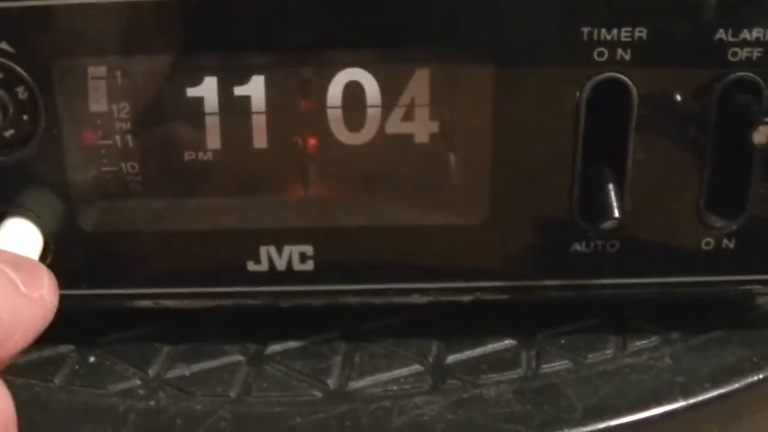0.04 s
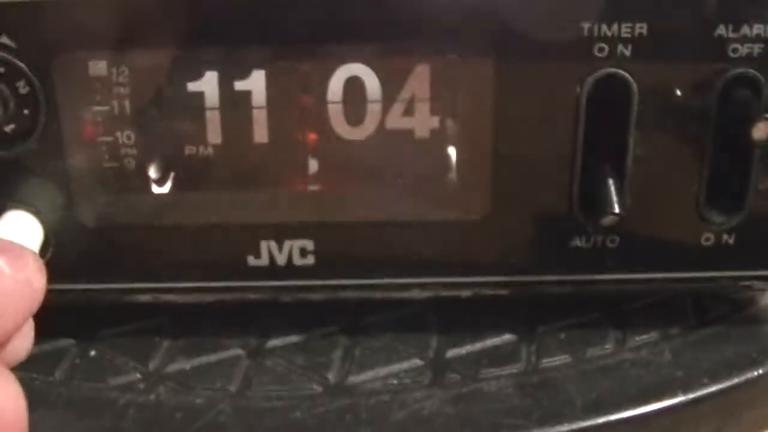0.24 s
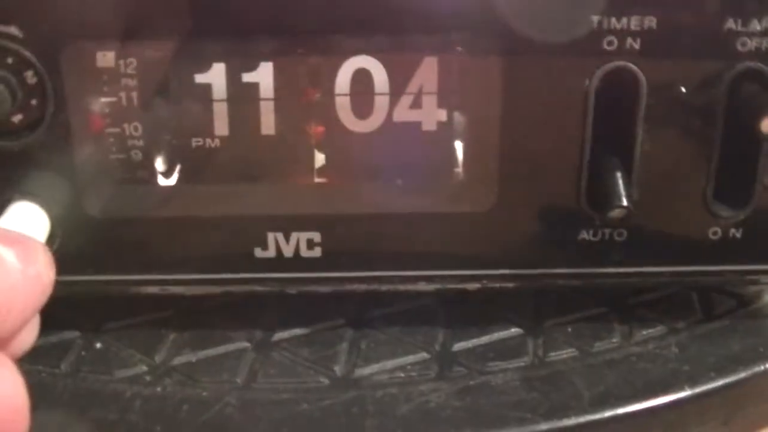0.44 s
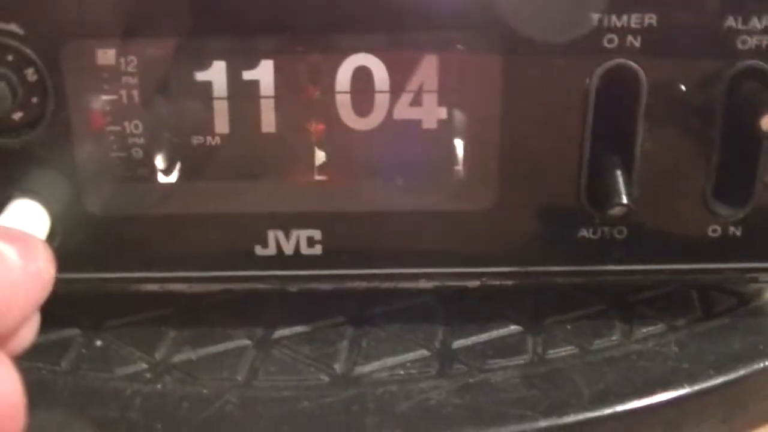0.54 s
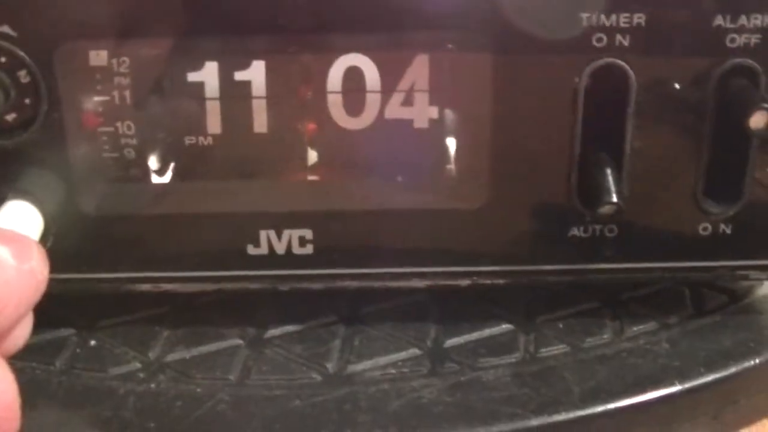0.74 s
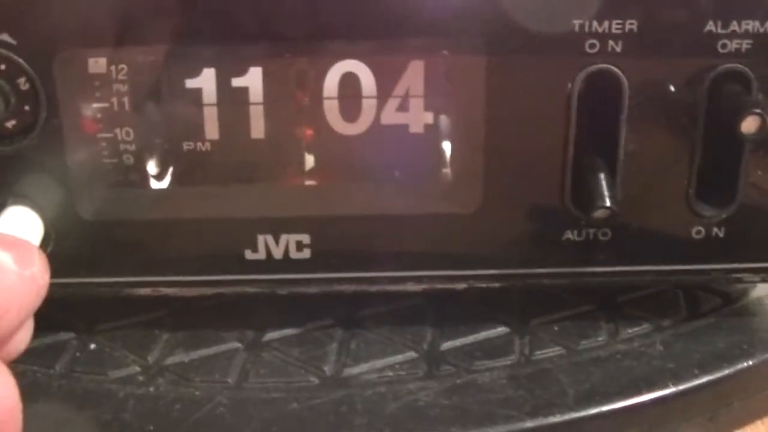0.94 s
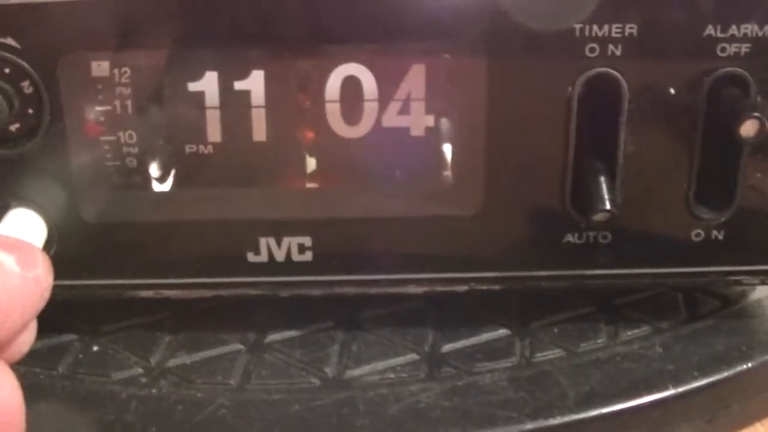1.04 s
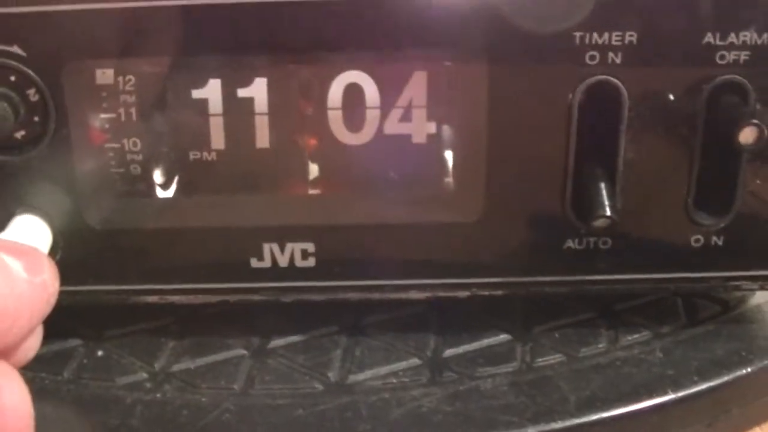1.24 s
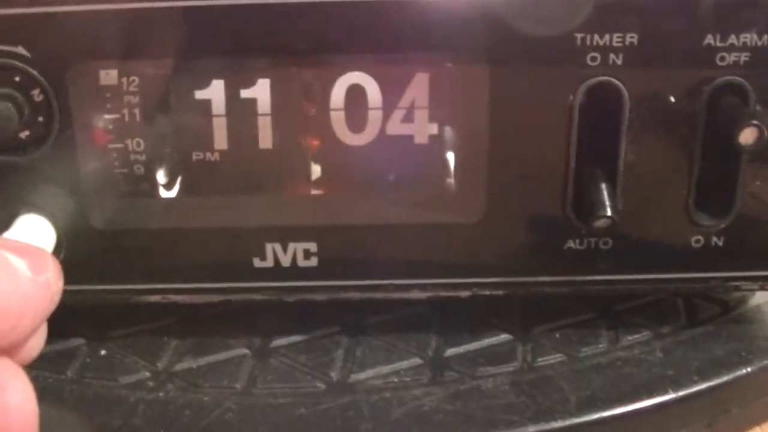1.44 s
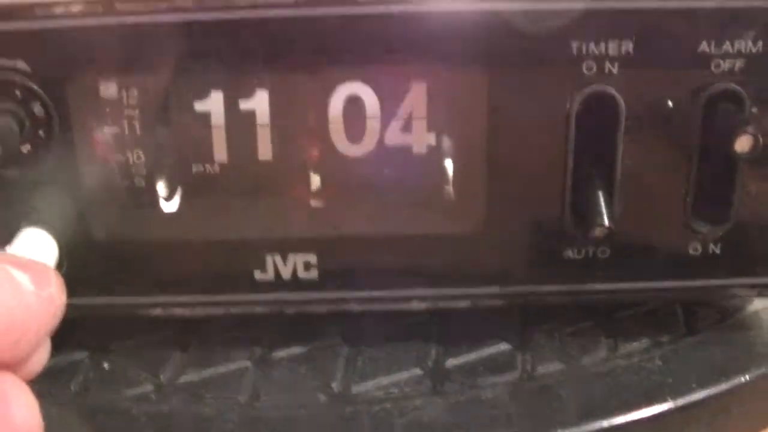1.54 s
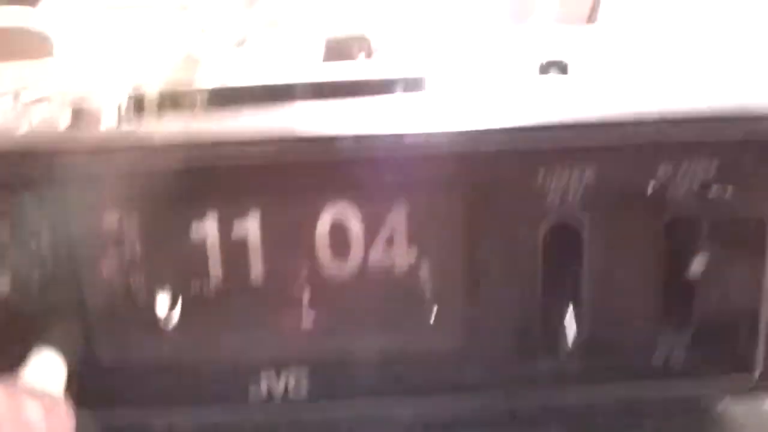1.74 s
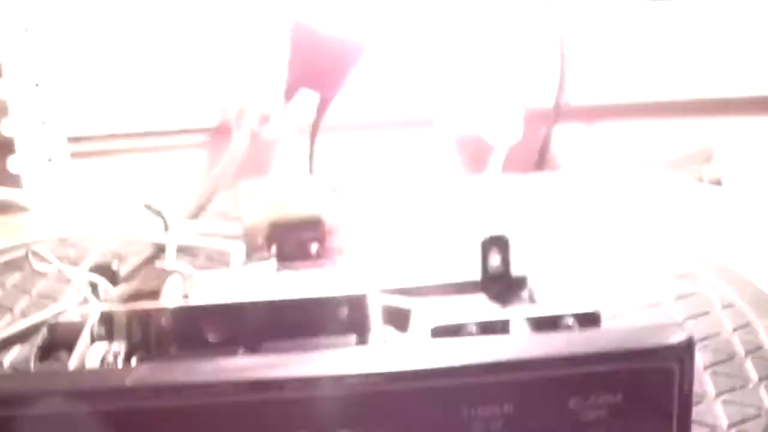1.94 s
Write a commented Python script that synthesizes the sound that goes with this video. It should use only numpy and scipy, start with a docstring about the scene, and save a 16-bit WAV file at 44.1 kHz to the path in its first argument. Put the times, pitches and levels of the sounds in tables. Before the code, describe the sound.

One sharp button click on a flip clock radio, over its faint ticking motor.

```python
"""A button on a flip clock radio

A finger presses the button, close by in a small room. The latch scrapes, snaps home against the
plastic case and rattles; each impact excites damped modes, and the spring rings on. The motor hums,
its gears tick in a quick loop, and the finger makes small creaks on the button."""
import sys
import numpy as np
from scipy import signal
from scipy.fft import rfft, irfft
from scipy.io import wavfile

SR = 44100
rng = np.random.default_rng(int(sys.argv[2]) if len(sys.argv) > 2 else 0)


def transcribe(signal):
    """Save signal, clipped to [-1, 1], as a 16-bit WAV file at the path in sys.argv[1]."""
    frames = np.atleast_2d(signal).T
    limited = np.clip(frames, -1, 1)
    pcm = np.round(limited * 32767).astype(np.int16)
    wavfile.write(sys.argv[1], SR, pcm)


N = 88200
T = np.arange(N) / SR
MOTOR_PAN_DB = 1.1
# the latch snaps home and bounces: start_s, level_db
SNAPS = [(0.2140, -13.5), (0.2154, -25), (0.2171, -27.5)]
SNAP_S = SNAPS[0][0]
# left-right coherence of contacts and echoes: frequency_hz, correlation
COHERENCE = [(100, 0.21), (400, 0.99), (1300, 0.97), (4000, 0.95), (8000, 0.34), (15000, 0.13)]


def case():
    """Impact excitation: the snap and its bounces ring the damped modes of the plastic case."""
    # case modes: pitch_hz, level_db, t60_s, pan_db
    modes = [(513, -6, 0.015, 2), (745, -5.5, 0.012, 1), (960, -5.5, 0.023, .8), (1290, -1, 0.0067, 0.5),
             (2004, -1, 0.018, 2), (3093, 1, 0.014, 1.2), (4510, -8.5, 0.024, -.8), (6670, -6.5, 0.017, -1),
             (8320, -4.5, 0.006, -3), (9050, -6.5, 0.0068, 1), (14500, -10, 0.0044, -3)]
    return sum((-1) ** k * pan(pan_db) * ring(clicks(SNAPS), [(hz, db, t60)])
               for k, (hz, db, t60, pan_db) in enumerate(modes))


def latch():
    """Friction and impact: each light contact of the metal latch scrapes and rings its modes."""
    # contacts: start_s, level_db, t60_s
    contacts = [(0.2075, -17.5, 0.031), (0.2377, -22.5, 0.0047), (0.2481, -22, 0.0096)]
    # scrape spectrum: frequency_hz, density_db
    spectrum = [(180, -63), (300, -21), (1970, -2.5), (2880, -33), (5160, -5.5), (6520, -12), (9240, -3.5),
                (11300, 0.5), (12300, -1), (14700, -17.5), (16000, 0)]
    # latch modes: pitch_hz, level_db, t60_s
    modes = [(7920, -6.5, 0.022), (8730, -2.5, 0.019), (9440, -5, 0.048), (11880, -6, 0.011),
             (14400, -9, .022)]
    scrape = noise(spectrum) * sum(from_db(db) * decay(s, t60) for s, db, t60 in contacts)
    return scrape + ring(clicks([(s, db - 3) for s, db, _ in contacts]), modes)


def spring():
    """Free vibration: the lightly damped spring and frame ring on after the snap."""
    # spring and frame modes: pitch_hz
    pitches = [345, 680, 1260, 1922, 2068, 2211, 2707, 2944, 3346, 3454, 3989]
    # their strength and damping: level_db, t60_s
    decays = [(-46.5, 0.25), (-47, 0.19), (-37, 0.08), (-33, 0.19), (-40, 0.51), (-62, 0.12), (-33.5, 0.16),
              (-53, 0.11), (-37, 0.13), (-39, 0.24), (-53, 0.11)]
    modes = [(hz, db, t60) for hz, (db, t60) in zip(pitches, decays)]
    return pan(-0.6) * ring(clicks([(SNAP_S, 0)]), modes)


def room():
    """Reverberation: the snap's crack leaves a diffuse tail, whose bass builds up later."""
    # crack and tail spectrum: frequency_hz, density_db
    spectrum = [(35, -74), (60, -55), (196, 2), (272, -5), (343, -0.5), (433, -16), (509, -3), (705, -7.5),
                (1050, -7), (2010, -2), (2360, -2), (3420, -3.5), (7200, -12), (8280, -7), (9300, -8),
                (14500, -16), (15500, -30)]
    # room bass spectrum: frequency_hz, density_db
    bass = [(30, -24), (120, -26.5), (200, 2), (270, -21.5), (345, 1.5), (520, -11), (900, -22.5),
            (4000, -66)]
    crack = from_db(-15) * noise(spectrum) * decay(SNAP_S, t60_s=0.01)
    tail = from_db(-28.5) * noise(spectrum) * decay(SNAP_S, t60_s=0.17, hold_s=0.027)
    tail *= np.clip((T - SNAP_S) / 0.0013, 0, 1)
    boom = from_db(-44) * noise(bass) * decay(SNAP_S, t60_s=0.12, hold_s=0.015)
    boom *= np.clip((T - SNAP_S) / 0.015, 0, 1)
    bass_cut = signal.butter(1, 420, "high", fs=SR, output="sos")
    return boom + signal.sosfilt(bass_cut, crack + tail)


def gears():
    """Backlash: slipping teeth and clacks of closing play ring the gear train in turn."""
    # once a turn a few teeth slip past: time_s, level_db
    runs = [(0.0955, -51.5), (0.396, -50.5), (0.5465, -53.5), (0.6955, -50), (0.8457, -49), (0.9948, -50.5),
            (1.1455, -51), (1.2946, -53.5), (1.4459, -52.5), (1.5944, -51), (1.7452, -48.5),
            (1.8943, -54.5)]
    # teeth of a run, timed from the strongest: offset_s, gain_db
    teeth = [(-.0068, 4), (0, 7.5), (.0085, 1), (0.0164, 0.5)]
    # the play closes and rebounds: start_s, level_db, rebound_delay_s, rebound_db
    closures = [(0.1478, -45, .003, -48), (0.4490, -58, .009, -78), (0.5992, -49, .0175, -45.5),
                (0.7500, -45, .003, -55), (0.8990, -46.5, .008, -50.5), (1.048, -40.5, .010, -49),
                (1.1985, -47, .009, -48), (1.3502, -43.5, .009, -50), (1.499, -46, .004, -61),
                (1.6490, -45.5, .010, -44.5), (1.8006, -51, .013, -47.5), (1.9490, -47.5, .010, -52)]
    # gear train modes: pitch_hz, run_db, clack_db, t60_s
    modes = [(629, -15.5, -17.5, 0.046), (930, -28, -15, 0.012), (1458, -17, -7.5, 0.025),
             (1720, -9.5, -15.5, 0.04), (1956, -12.5, -12.5, 0.034), (2340, -10.5, -9, 0.0067),
             (2810, -5, 0, 0.02), (2990, -2.5, 1, 0.01), (3230, -6, -4.5, 0.0064), (4470, -36, -21, 0.0088)]
    jitter_s, spread_db = 0.0003, 2.16
    slips = clicks([(s + offset + jitter_s * rng.standard_normal(), db + gain_db)
                    for s, db in runs for offset, gain_db in teeth])
    clacks = clicks([hit for s, db, delay, rebound_db in closures
                     for hit in ((s, db), (s + delay, rebound_db))])
    direct = 0
    for k, (hz, run_db, clack_db, t60) in enumerate(modes):
        drive = from_db(run_db) * slips + from_db(clack_db) * clacks
        drive *= from_db(spread_db * rng.standard_normal(N))  # no two contacts ring alike
        direct += (-1) ** k * ring(drive, [(hz, 0, t60)])
    room_response = unit_rms(noise([(20, 0), (20000, 0)]) * decay(0, t60_s=0.08)) / np.sqrt(N)
    reverb = signal.fftconvolve(direct[None], room_response, axes=1)[:, :N]
    return pan(MOTOR_PAN_DB) * direct + from_db(-7) * reverb


def finger():
    """Stick-slip friction: the finger creaks in tiny uneven jerks, and the case gives with one knock."""
    # creaks and ticks: start_s, level_db, t60_s, tilt_db_per_octave, ring_hz, ring_db
    creaks = [(0.0015, -43.5, 0.035, 0, 2190, -45.5), (0.0796, -44, 0.029, 0, 3615, -42),
              (0.76, -47.5, 0.036, -2, 1830, -45.5), (0.7652, -48, 0.14, -0.5, 4510, -45.5),
              (0.9723, -59.5, 0.012, -1, 2270, -53), (1.037, -57, 0.022, 11, 3030, -60),
              (1.0584, -50, 0.11, 3, 4380, -49), (1.0661, -49.5, 0.048, 0, 4350, -49),
              (1.132, -54.5, 0.016, -7.5, 1370, -49), (1.183, -52.5, 0.031, -1.5, 4570, -55),
              (1.911, -50, 0.037, 2, 2386, -48)]
    # creak spectrum: frequency_hz, density_db
    spectrum = [(180, -63), (300, -5), (814, -1.5), (3860, -6), (4390, -7), (5350, -11), (8600, -12.5),
                (9180, -17), (13200, -27), (15000, -57)]
    jerk_s, jerk_db, ring_t60_s = 0.0012, 3, 0.021
    knock = ring(clicks([(0.772, -48.5)]), [(906, 0, 0.12)])
    jerks = np.interp(T / jerk_s, np.arange(N // 8), rng.standard_normal(N // 8))
    grit = unit_rms(from_db(jerk_db * jerks))
    out = knock
    for s, db, t60, tilt, ring_hz, ring_db in creaks:
        room_tail = from_db(-11.5) * decay(s, t60_s=0.17)
        envelope = np.hypot(grit * decay(s, t60), room_tail)  # incoherent parts add in power
        out = out + from_db(db) * envelope * noise(spectrum, tilt_db_per_octave=tilt)
        out += ring(clicks([(s, ring_db)]), [(ring_hz, 0, ring_t60_s)])
    return out


def motor():
    """Narrowband resonance: the motor hums in wavering tones, each a resonator driven by noise."""
    # tones before the swell: pitch_hz, start_db, end_db, bandwidth_hz, swell_factor
    tones = [(125.6, -76, -73, 6, 0.21), (209.7, -67.5, -65.5, 5.7, 1.75), (367.3, -81, -68, 17, 0.63),
             (600.6, -74, -74, 6.7, 0.17), (857, -67.5, -82, 3.6, 0.23), (1267, -76.5, -80, 5.9, 0.11),
             (2826, -82.5, -74, 14, 0.1), (2993, -73.5, -77, 63, 0.46)]
    # swell of the hum: time_s, gain_db
    swell = [(0, 2), (0.45, -3), (0.6, 2), (0.72, -3.5), (0.86, 2.5), (1.0, -4), (1.2, -1.5), (1.29, 3.5),
             (1.42, 0.5), (2, -4)]
    swell_db = np.interp(T, *np.transpose(swell))
    hum = 0
    for hz, start_db, end_db, bandwidth, swell_factor in tones:
        t60 = np.log(1000) / (np.pi * bandwidth)
        tone = ring(rng.standard_normal(2 * N), [(hz, 0, t60)])[N:]  # steady state only
        hum += from_db(np.linspace(start_db, end_db, N) + swell_factor * swell_db) * unit_rms(tone)
    return pan(MOTOR_PAN_DB) * hum


def hush():
    """Diffuse field: the room's faint noise is only weakly correlated between left and right."""
    # hush spectrum: frequency_hz, density_db
    spectrum = [(15, -59), (25, -9.5), (178, -5), (582, -6), (722, -8), (1270, -14.5), (1620, -13),
                (2120, -15), (2700, -16.5), (2920, -22.5), (3170, -18.5), (3930, -19), (4620, -21),
                (5010, -20.5), (15500, -29)]
    # left-right coherence: frequency_hz, correlation
    coherence = [(40, 0.07), (200, 0.22), (1000, 0.22), (3000, 0.18), (8000, 0.11), (15000, .1)]
    # slow level drift: time_s, gain_db
    drift = [(0, -0.5), (0.6, -0.5), (1.0, -0.5), (1.68, -0.5), (1.8, 1), (2, 0)]
    return from_db(-60 + np.interp(T, *np.transpose(drift))) * noise(spectrum, coherence)


def ring(drive, modes):
    """Modal superposition: damped sines of alternating sign, from rows of pitch_hz, level_db, t60_s."""
    out = 0
    for k, (hz, db, t60) in enumerate(modes):
        radius, angle = from_db(-60 / (t60 * SR)), 2 * np.pi * hz / SR
        feedback = [1, -2 * radius * np.cos(angle), radius ** 2]
        out += (-1) ** k * from_db(db) * signal.lfilter([0, np.sin(angle)], feedback, drive + 1e-18)
    return out


def noise(spectrum, coherence=COHERENCE, tilt_db_per_octave=0):
    """Spectral shaping: stereo noise of unit rms, its coherence set by the mix of mid and side."""
    # excess of left over right: frequency_hz, level_db
    balance = [(50, 1.5), (250, 1.5), (2000, 0.7), (5000, 0), (9000, -0.1), (15000, -0.2)]
    hz = np.maximum(np.arange(N // 2 + 1) * SR / N, 1)
    curves = map(np.transpose, (spectrum, coherence, balance))
    level_db, correlation, left_db = (np.interp(np.log(hz), np.log(f), y) for f, y in curves)
    level_db += tilt_db_per_octave * np.log2(hz / 3000)
    mid, side = rfft(rng.standard_normal((2, N)))
    sign = np.array([[1], [-1]])
    stereo = np.sqrt(1 + correlation) * mid + np.sqrt(1 - correlation) * side * sign
    return unit_rms(irfft(stereo * from_db(level_db + sign * left_db / 2), N))


def decay(start_s, t60_s, hold_s=0):
    """Exponential decay: the envelope opens at once, holds, then falls 60 dB in t60_s."""
    return (T >= start_s) * from_db(-60 * np.clip((T - start_s - hold_s) / t60_s, 0, 10))


def clicks(hits):
    """Ideal impacts: one impulse for each row of start_s, level_db."""
    out = np.zeros(N)
    for s, db in hits:
        out[int(s * SR)] += from_db(db)
    return out


def pan(db):
    """Level panning: the left gains db and the right loses as much."""
    return from_db([[db], [-db]])


def from_db(db):
    """Decibels to amplitude ratio."""
    return 10 ** (np.asarray(db) / 20)


def unit_rms(x):
    """Normalisation to unit power."""
    return x / np.sqrt(np.mean(x ** 2) + 1e-20)


def scene():
    """Superposition: the pressures of all sources add at the microphone."""
    return case() + latch() + spring() + room() + gears() + finger() + motor() + hush()


def record(dry):
    """Band limiting: a steep low-pass cuts the treble above 15.5 kHz."""
    return signal.sosfilt(signal.ellip(10, .1, 80, 15500, fs=SR, output="sos"), dry)


dry = scene()
out = record(dry)
transcribe(out)
```